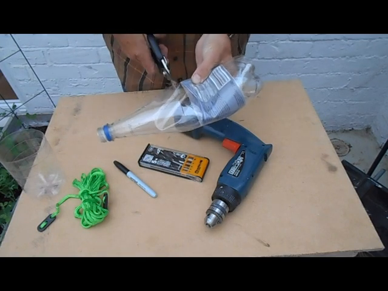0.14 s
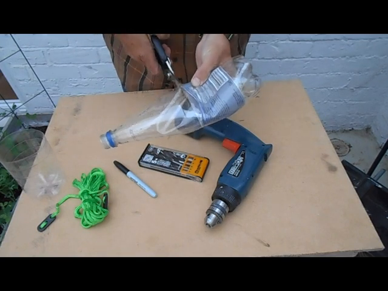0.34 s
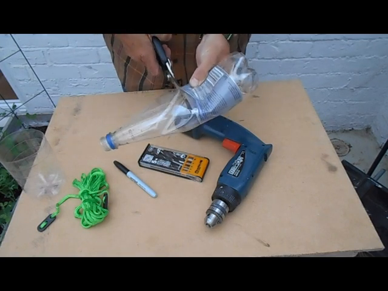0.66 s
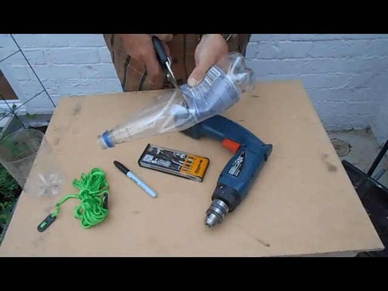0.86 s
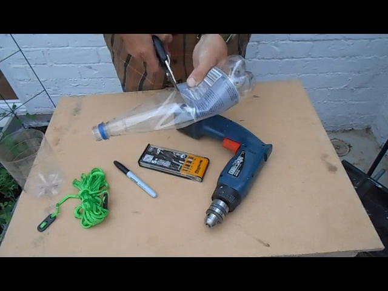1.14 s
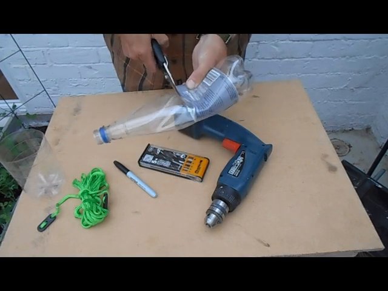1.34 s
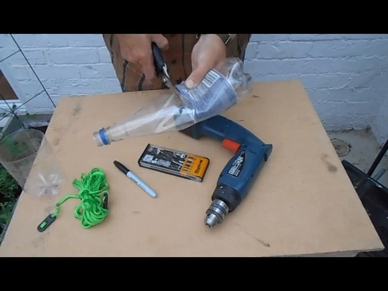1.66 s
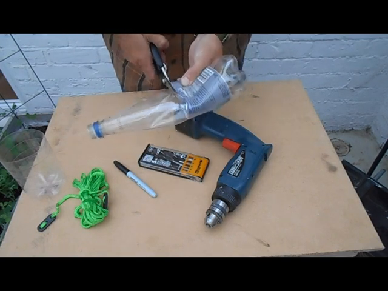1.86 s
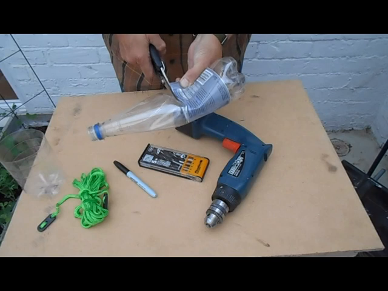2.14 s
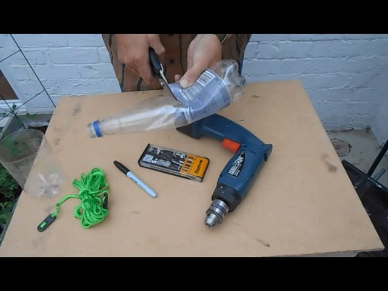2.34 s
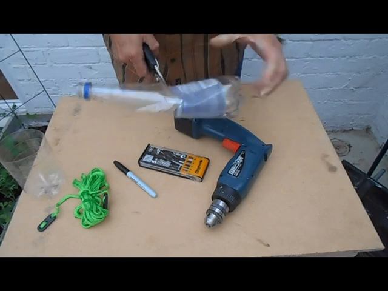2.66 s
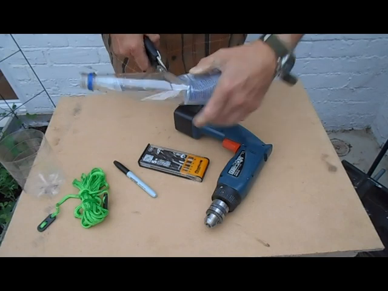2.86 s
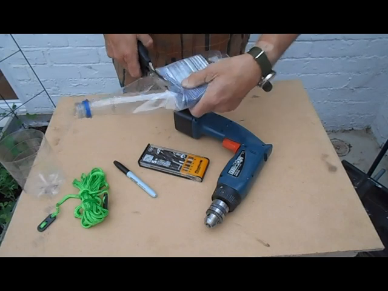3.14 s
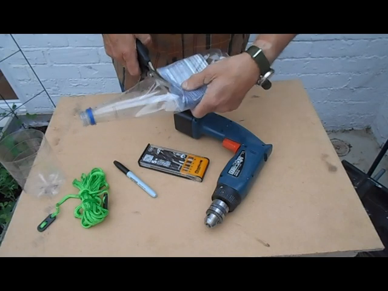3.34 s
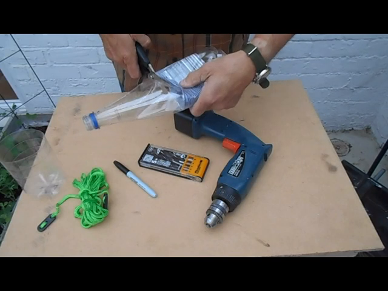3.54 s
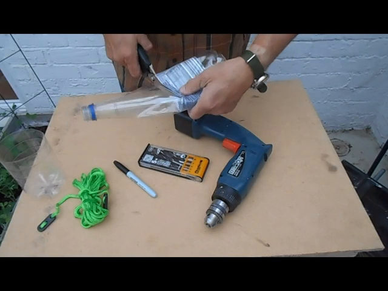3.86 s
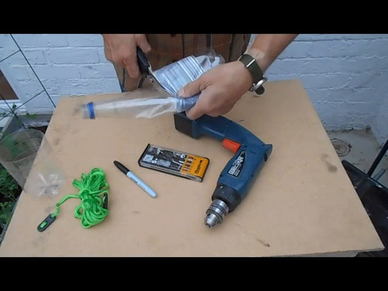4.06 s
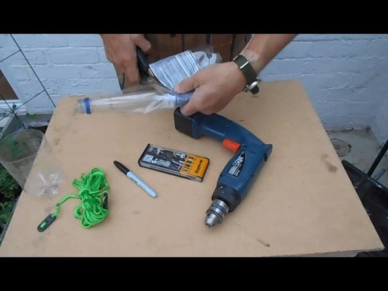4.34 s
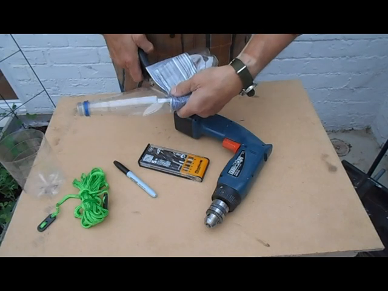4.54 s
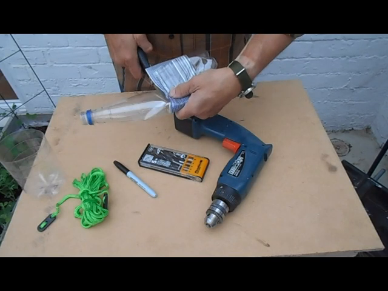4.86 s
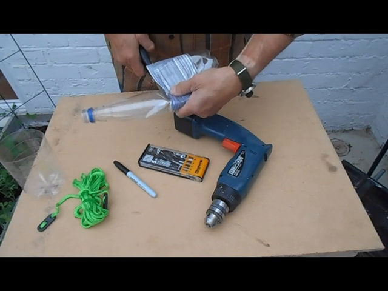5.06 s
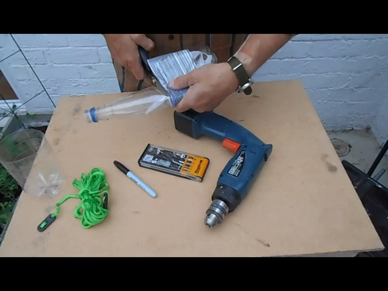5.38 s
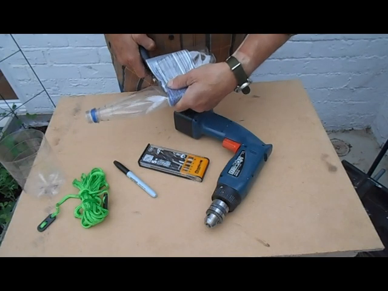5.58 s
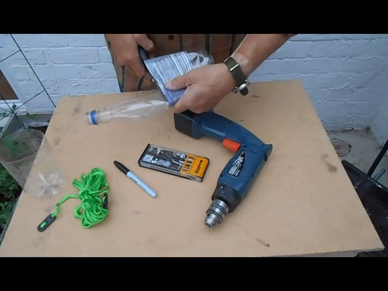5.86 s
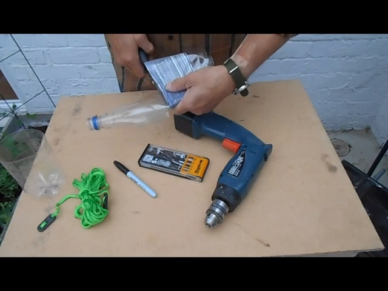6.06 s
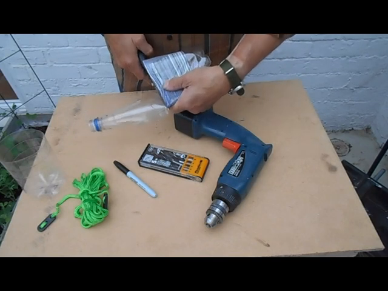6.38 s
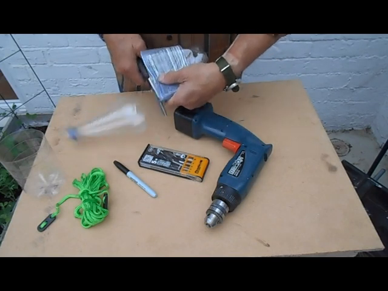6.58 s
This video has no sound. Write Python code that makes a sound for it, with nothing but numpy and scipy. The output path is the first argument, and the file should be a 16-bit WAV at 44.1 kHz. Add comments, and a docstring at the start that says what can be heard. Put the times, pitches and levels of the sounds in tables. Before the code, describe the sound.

Close view of shears cutting a thin plastic bottle over an outdoor workbench. A nearly quiet first second has faint grip rustle, then bright snaps and tiny ripping ticks come in irregular clusters. The hollow wall pops and crinkles more as the cut opens, with short squeaky tears midway. The loudest crack comes at the end as the piece gives way. Each blow rings briefly in the shell and walled yard.

```python
"""Quiet outdoor air and a faint rustle of the grip, then shears cut round a thin plastic bottle
over a workbench in a walled yard. The wall snaps, ticks and buckles under the blades, tears in runs of tiny
slips that quicken with the force of the hand, and crinkles more in the grip as the cut opens.
Noise bursts make the snaps, pulses the slips and ticks, sines the buckles, random grains the rustle;
everything rings in the hollow shell and off the bench and bricks."""
import sys
import numpy as np
from scipy import signal
from scipy.fft import rfft
from scipy.io import wavfile
from scipy.ndimage import uniform_filter1d

SR = 44100
rng = np.random.default_rng(int(sys.argv[2]) if len(sys.argv) > 2 else 0)


def store_wav(level_fs):
    """Save 16-bit WAV to argv[1]."""
    pcm = np.round(np.clip(np.atleast_2d(level_fs), -1, 1) * 32767)
    wavfile.write(sys.argv[1], SR, pcm.T.astype(np.int16))


N = 295911
TAPS = 2048  # samples in one short sound or filter
HZ = np.fft.rfftfreq(TAPS, 1 / SR)

# edges of the bands that share out a snap's level: edge_hz
SNAP_EDGES = [280, 800, 1800, 4200, 10000]


def amp(db):
    """Decibels to gain."""
    return 10 ** (np.asarray(db) / 20)


def unit(x):
    """Scales to an rms of one."""
    return x / np.sqrt(np.mean(x ** 2) + 1e-20)


def read(points, hz=HZ):
    """Joins (Hz, value) points on a log-frequency axis."""
    f, value = np.transpose(points)
    return np.interp(np.log(hz + 1), np.log(f + 1), value)


def add(mix, s, sound):
    """Mixes a sound in at time s."""
    part = mix[max(round(s * SR), 0):][:len(sound)]
    part += sound[:len(part)]


def click(db):
    """The sharpest causal pulse with this spectrum (minimum phase)."""
    log_gain = np.log(amp(np.r_[db, db[-2:0:-1]]))
    return np.fft.ifft(np.exp(np.conj(signal.hilbert(log_gain)))).real


def through(x, response):
    """Passes a sound through an impulse response."""
    return signal.oaconvolve(x, response)[:N]


def yard_air(level_db=-71):
    """Distant outdoor air: steady noise, coloured."""
    # colour of the air: pitch_hz, relative_level_db
    air_colour = [(25, -4.5), (90, 9), (400, 18.5), (3000, 12), (9000, -3.5), (15000, -80)]
    return amp(level_db) * unit(through(rng.standard_normal(N), click(read(air_colour))))


def slip(flutter=0.3, flutter_decay_s=0.0018, patch_db=7):
    """One slip: a sharp pulse, coloured by the patch of wall that flutters beside the blade."""
    # colour of one slip: pitch_hz, relative_level_db
    slip_colour = [(60, -48.5), (200, -23), (450, -4), (900, 1.5), (1800, 2.5), (3200, 7.5), (6000, 3.5),
                   (9000, 1), (14000, -7)]
    t = np.arange(TAPS) / SR
    wall = (t == 0) + flutter * rng.standard_normal(TAPS) * np.exp(-t / flutter_decay_s)
    octaves = np.log2((HZ + 1) / 4000) - rng.uniform(-1, 1)  # from the patch's own pitch
    patch = 1 / (1 + (10 * octaves) ** 2)
    pulse = through(wall, click(read(slip_colour) + patch_db * patch))[:TAPS]
    return -pulse / np.linalg.norm(pulse)


def grains(per_s, spread_db):
    """Random tiny ticks, a few of them much larger than the rest."""
    size = amp(spread_db * np.minimum(rng.exponential(1, N), 4))
    struck = rng.choice([-1, 1], N) * (rng.random(N) < per_s / SR)
    return unit(size * struck)


def handling(rub_db=-1, crinkle_db=-13.0, crinkle_db_per_s=2.5, waver_db=2):
    """Each shift of the grip swells, wavers and fades: dull rubbing and crinkling from several patches of wall."""
    # shifts of the grip on the bottle: middle_s, half_length_s, relative_level_db
    shifts = [(.01, 0.027, -58.5), (0.226, 0.084, -58.5), (0.431, 0.027, -50), (0.903, 0.022, -42.5),
              (1.14, 0.038, -43), (1.382, 0.29, -55), (1.397, 4.6, -62.5), (1.808, 0.071, -42.5),
              (2.073, 0.051, -52), (2.193, 0.097, -39.5), (2.508, 0.037, -41.5), (3.082, 0.097, -39),
              (3.48, 0.05, -41.5), (3.692, 0.2, -46.5), (3.99, 0.037, -34.5), (4.126, 0.0084, -43),
              (4.244, 0.13, -44), (4.418, 0.026, -35.5), (4.89, 0.011, -42), (5.37, 0.088, -51),
              (6.177, 0.031, -48), (6.476, 0.049, -42.5), (6.513, 0.023, -25.5)]
    # colour of rubbing: pitch_hz, relative_level_db
    rub_colour = [(50, -62), (120, -15.5), (280, -3.5), (420, 4), (900, 4), (2500, 1), (9000, -15)]
    t = np.arange(N) / SR
    grip = sum(amp(db) * np.exp(-np.minimum(((t - s) / width) ** 2, 20)) for s, width, db in shifts)
    grip = grip * amp(waver_db * unit(uniform_filter1d(rng.standard_normal(N), size=900)))
    dull = unit(through(grains(per_s=1700, spread_db=1.5), click(read(rub_colour))))
    fine = unit(sum(through(grains(per_s=250, spread_db=13.5), slip()) for _ in range(4)))
    # the wall goes slack as the cut opens, so the same shift crinkles more
    crinkle = fine * amp(crinkle_db + crinkle_db_per_s * t)
    return grip * (dull * amp(rub_db) + crinkle)


def shell(x):
    """The hollow bottle hums at its low modes after each blow."""
    # low modes of the hollow shell: pitch_hz, relative_level_db, t60_s
    shell_modes = [(150, 7, .5), (250, -3.5, .072), (381, 5, .3), (556, -2, .35), (927, -2, .3)]
    t = np.arange(SR // 2) / SR
    response = 0
    for hz, db, t60 in shell_modes:
        per_sample = 2 * np.log(1000) / (t60 * SR)  # evens out long and short modes
        response = response + amp(db - 60 * t / t60) * np.sin(2 * np.pi * hz * t) * per_sample
    return through(x, response)


def ring(x, onset_s=0.0011, turn_hz=3, clump_db=2.0):
    """Reflections arrive in uneven clumps and die away band by band; their pattern shifts as the bottle turns."""
    # the lingering ring of shell and yard: pitch_hz, relative_level_db, t60_s
    table = np.array([(149, -16.5, 0.5), (454, 1, 0.32), (1100, -1, 0.26), (2980, -5, 0.24),
                      (4850, -4, 0.28), (12000, -9, 0.24)])
    out = np.zeros(N)
    for k in range(3):
        taps = rng.standard_normal(SR // 2) * (rng.random(SR // 2) < .15)  # sparse reflections
        taps *= amp(clump_db * unit(uniform_filter1d(rng.standard_normal(SR // 2), size=100)))
        hz, t, z = signal.stft(unit(taps), SR, nperseg=256)
        db = read(table[:, [0, 1]], hz)[:, None]
        t60 = read(table[:, [0, 2]], hz)[:, None]
        z *= amp(db - 60 * t / t60) * np.sqrt(2 * np.log(1000) / (t60 * SR))
        tail = signal.istft(z, SR, nperseg=256)[1]
        tail *= 1 - np.exp(-np.arange(len(tail)) / SR / onset_s)
        # three patterns take turns at a constant total power
        share = np.cos(np.pi * (turn_hz * np.arange(N) / SR + k / 3)) * np.sqrt(2 / 3)
        out += through(x * share, tail)
    return out


def crack_bands(level_db, tilt_db, pitch_hz, hump_db, middle_hz=1930, arch_db=1.13):
    """Shares a snap's level out over the bands by its brightness and the resonance of its panel."""
    edges = np.array(SNAP_EDGES)
    centres = np.sqrt(edges[1:] * edges[:-1])
    octaves = np.log2(centres / middle_hz)
    hump = hump_db / (1 + np.log2(centres / pitch_hz) ** 2)
    shape_db = tilt_db * octaves - arch_db * octaves ** 2 + hump
    return level_db + shape_db - 20 * np.log10(np.linalg.norm(amp(shape_db)))


def snap(decay_s, pitch_hz, band_db, panel_db=5, width_hz=330, damping=0.088, hollow=1.0, carried=0.84,
         level_db=-0.5, jerk_db=2.5):
    """A crack runs in jerks, stops short and rings the panel it crosses; returns (direct, spread into shell)."""
    t = np.arange(TAPS) / SR
    jerks = amp(jerk_db * unit(uniform_filter1d(rng.standard_normal(TAPS), size=70)))
    burst = rng.standard_normal(TAPS) * jerks * np.exp(-.5 * (t / decay_s) ** 2)
    own_db = 10 * np.log10(uniform_filter1d(abs(rfft(burst)) ** 2, size=25))
    edges = np.array(SNAP_EDGES)
    # band levels over 10 ms become energy per frequency bin
    density_db = band_db + 10 * np.log10(SR / 100 * SR / 2 / np.diff(edges))
    centres = np.sqrt(edges[1:] * edges[:-1])
    # a small panel radiates little bass
    skirt_db = read([(30, -90.5), (110, -36.0), (340, -1.5), (700, 1.0), (7000, 2.0), (14000, -12.0)])
    crack_db = read(list(zip(centres, density_db))) + skirt_db - own_db + level_db
    panel = 1 / (1 + ((HZ - pitch_hz) / (width_hz + damping * pitch_hz)) ** 2)
    # the duller the snap, the clearer its pitch
    tock_db = hollow * min(band_db.max() - band_db[-1], 20)
    pitch_db = panel_db * panel + tock_db * (panel - .5)
    # the panel stops at once, so less of its pitch carries into the lingering ring
    return [through(burst, click(crack_db + share * pitch_db)) for share in (1, carried)]


def snaps():
    """Every crack of the wall, a shaped noise burst each: rows (direct, spread into the shell)."""
    # snaps of the bottle wall: start_s, level_db (over 10 ms, before the panel's ring),
    # brightness_db_per_octave, panel_pitch_hz, hump_db (round that pitch), burst_decay_s
    cracks = [(0.1616, -55.5, -1.5, 1160, 13, 0.0026), (0.1827, -42.5, 0.5, 430.0, -5.5, 0.0037),
              (0.6648, -53.5, 0.5, 4040.0, 5, 0.0026), (0.7554, -45, 2.5, 2430, 5.5, 0.02),
              (0.968, -39, -3.5, 705, 7, 0.0026), (0.968, -37.5, -4, 2040, 6, 0.0025),
              (1.104, -29, 6, 3470, 19, 0.00067), (1.143, -26.5, 11.5, 404, 33, 0.0035),
              (1.163, -23.5, 7, 5650, -11, 0.0024), (1.1762, -27, 11, 7050, -10, 0.0017),
              (1.1806, -29, 3.5, 5140, 10, 0.0011), (1.227, -27, 4.5, 4370, 27, 0.0014),
              (1.3979, -35.5, 0.5, 2100, 1.5, 0.022), (1.586, -19, 5, 2320, 8.5, 0.0025),
              (1.632, -34.5, 0.5, 1280, 2, 0.0016), (1.6623, -35.5, 4, 1170, 11, 0.0012),
              (1.68, -25, 4, 2820, 0, 0.0022), (2.044, -38, -2, 1080, 0.5, 0.0026),
              (2.076, -35.5, 4.2, 1880, 18, 0.00055), (2.1074, -29, -3, 1100, 1, 0.004),
              (2.122, -25.5, 2, 9150, 16, 0.0055), (2.1678, -27, -0.5, 9300, 27, 0.0057),
              (2.27, -30, 0, 860, 6, 0.0015), (2.323, -33.5, 4.5, 4630, 1, 0.0018),
              (2.426, -34, -2.5, 8350, 3, 0.0015), (2.5908, -21, -0.5, 3130, 2, 0.0032),
              (2.7174, -24.5, -3, 4400, 13.5, 0.0023), (2.993, -29, 2.5, 2140, -7, 0.0041),
              (3.0671, -22.5, 1.5, 1100, -4, 0.0027), (3.117, -31, 4, 1190.0, 9, 0.0036),
              (3.259, -36, -5.5, 404, -9.5, 0.0041), (3.31, -41.5, 2.5, 4800, 10, 0.00089),
              (3.411, -31, -1, 630, 4, 0.0022), (3.4853, -36, 0, 1410, -12, 0.0012),
              (3.5014, -36, 0, 1910, -5, 0.0028), (3.608, -29.5, 1, 364, 4, 0.003),
              (3.664, -20.5, 0, 3400, 8, 0.002), (3.813, -17.5, 2, 2144, 1.5, 0.0044),
              (3.993, -26.5, -4, 4100, -9, 0.0046), (4.139, -19.5, 2.5, 8400, 4, 0.0062),
              (4.3263, -32, -4.5, 1960, 6.5, 0.00096), (4.423, -27.5, 2, 1370, 6, 0.0012),
              (4.4492, -30, -0.5, 6350, 16, 0.0015), (4.6495, -25, -1.5, 7400, 12, 0.0051),
              (4.9843, -23, 1.5, 5350, 8.5, 0.003), (5.162, -29, 2.5, 870, 1.5, 0.0027),
              (5.3351, -33.5, 0.8, 2060, -4.5, 0.003), (5.401, -44, -1, 910, -8, 0.0027),
              (5.417, -53, 14, 6870, 5, 0.00081), (5.434, -48.5, 1, 7750, 17, 0.0006),
              (5.671, -27.5, 3.5, 3800, 20, 0.013), (5.85, -25.5, 0.9, 5200, 15, 0.0024),
              (5.866, -30.5, 4, 2330, 0, 0.0031), (5.8854, -29.5, 8.5, 2470, 14, 0.0012),
              (5.8931, -31, 5, 2000, 3, 0.0025), (6.018, -18.5, 2, 2600, 3, 0.0026),
              (6.5017, -23.5, 4, 860, 18.5, 0.0055), (6.5061, -13, 3, 780, -16, 0.02),
              (6.5933, -21.5, 0.2, 960, 5.5, 0.001), (6.641, -30, -2, 4220, 29, 0.0018)]
    out = np.zeros((2, N))
    for s, level_db, tilt_db, pitch_hz, hump_db, decay_s in cracks:
        band_db = crack_bands(level_db, tilt_db, pitch_hz, hump_db)
        for path, sound in zip(out, snap(max(decay_s, .0003), pitch_hz, band_db)):
            add(path, s, sound)
    return out


def ticks(decay_s=0.00065):
    """A crease gives in one go: a slip drawn out into a very short crack."""
    # single sharp ticks: start_s, level_db (over 10 ms)
    creases = [(0.218, -51), (.872, -44.5), (.883, -56), (0.907, -42.5), (1.19, -27.5), (1.231, -30.5),
               (1.24, -31), (2.516, -40), (2.573, -50), (2.977, -57), (2.985, -42), (3.461, -44),
               (4.776, -37), (4.786, -32), (5.152, -42), (5.344, -34.5), (5.643, -39.5), (5.6767, -37),
               (5.69, -34.5), (5.7035, -30), (5.732, -37.5), (5.744, -33), (5.762, -28.5), (5.779, -30),
               (5.805, -43), (6.116, -36), (6.478, -39), (6.486, -30.5)]
    out, t = np.zeros(N), np.arange(TAPS) / SR
    for s, db in creases:
        crack = through(rng.standard_normal(TAPS) * np.exp(-t / decay_s), slip())
        add(out, s, amp(db) * np.sqrt(SR / 100) * crack / np.linalg.norm(crack))
    return out


def buckles(beat_cycles=4.9, side_share=0.65, low_hz=330):
    """A panel flips and rings with neighbours beating against it; the longer it rings, the closer they lie."""
    # whole panels popping over and ringing on: start_s, pitch_hz, level_db (before the decay), t60_s
    panels = [(.425, 519, -44.5, 0.1), (.915, 680, -35, 0.038), (.973, 652, -23, 0.04),
              (2.718, 677, -28, 0.053), (2.992, 1950, -21.5, 0.019), (3.41, 1080, -22, 0.038),
              (4.141, 4010, -18.5, 0.047), (6.019, 571, -21, 0.097), (6.017, 816, -18, 0.031),
              (6.508, 912, -12.5, 0.048), (6.594, 852, -24.5, 0.037), (6.593, 4480, -21, 0.031)]
    out, t = np.zeros(N), np.arange(SR // 3) / SR
    for s, hz, db, t60 in panels:
        sides = 0
        for off, turn in rng.uniform(-0.84, 1, size=(8, 2)):
            side_hz = hz + off * beat_cycles / t60
            sides = sides + np.sin(2 * np.pi * (side_hz * t + turn))
        modes = np.sin(2 * np.pi * hz * t) + side_share * sides
        attack = np.minimum(t / .001, 1)
        add(out, s, amp(db - 60 * t / t60) * unit(modes) * attack)
    # the buckles carry nothing below the low mids, so their onsets give no thud
    return signal.sosfilt(signal.butter(2, low_hz, "high", fs=SR, output="sos"), out)


def tears(jitter=0.6, steady_hz=330, uneven_db=5, level_db=-1, db_per_doubling=25):
    """The blade sticks and slips, faster as the force grows; fast runs lock into a nearly regular squeak."""
    # runs of slips as the blades tear or scrape: start_s, length_s, relative_level_db (midway),
    # swell_db (over the run), slips_per_s (midway)
    runs = [(1.061, 0.049, -50, -3.5, 97), (1.135, 0.041, -47, -3.5, 240), (1.266, 0.14, -46.5, -8.5, 74),
            (1.409, 0.034, -46.5, 7, 78), (1.776, 0.047, -41, 5.5, 147), (2.2, 0.019, -35, 3, 630),
            (2.431, 0.019, -35.5, 3, 910), (2.515, 0.058, -45, -9, 110), (2.977, 0.13, -42, 0.5, 100),
            (3.107, 0.047, -35, -3.5, 235), (3.456, 0.051, -65, 11, 120), (4.146, 0.021, -31, -3, 890),
            (4.415, 0.026, -33.5, 6.5, 900), (4.46, 0.013, -34.5, 20.5, 1330),
            (4.472, 0.033, -25.5, -4, 1480), (4.535, 0.011, -33, 18.5, 720),
            (4.659, 0.021, -27.5, -7.5, 660), (4.666, 0.024, -31, -4, 243), (4.79, 0.069, -29.5, -3.5, 360),
            (5.597, 0.062, -44.5, 16.5, 314), (5.672, 0.12, -39, -1, 193), (5.804, 0.11, -37.5, 2, 170),
            (5.883, 0.14, -35.5, -3.5, 186), (6.112, 0.013, -34.5, 7.5, 430),
            (6.404, 0.0072, -42, -9.5, 1640)]
    out, kinds = np.zeros(N), [slip() for _ in range(12)]
    for s, length, run_db, swell_db, mid_rate in runs:
        loose = 1 / (1 + (mid_rate / steady_hz) ** 4)  # near 0 in a locked, regular run
        u = 0  # share of the run that is cut
        for late, size, kind in rng.uniform(-1, 1, (120, 3)):
            if u >= 1:
                break
            force_db = swell_db * (u - .5)
            # a harder squeeze is louder and faster
            rate = mid_rate * 2 ** (force_db / db_per_doubling)
            slip_db = level_db + run_db + force_db + uneven_db * loose * size
            gain = amp(slip_db) * np.sqrt(SR / rate)
            add(out, s + u * length, gain * kinds[int(abs(kind) * len(kinds))])
            u += np.exp(late * jitter * loose) / rate / length
    return out


def scene():
    """The cutting, its ring and the quiet yard."""
    direct, spread = snaps() + buckles() + tears() + ticks() + handling()  # only snaps differ by path
    hum = shell(spread)
    air = yard_air()
    return (direct + hum + ring(spread + hum) + air)[None]


def record(dry, ceiling=0.86, lopsided=0.003, edge_hz=14600):
    """Loud peaks round off unevenly, adding a faint thud; then the microphone's colour and the band limit."""
    # microphone colour: pitch_hz, gain_db
    mic_colour = [(20, -9), (70, 1.5), (8000, 0.5), (9500, -2.5), (10400, -15), (11200, -36),
                  (12200, -11.5), (13300, -19.5), (14500, -29.5)]
    bent = ceiling * np.tanh(dry[0] / ceiling)
    heard = through(bent + lopsided * bent ** 2, click(read(mic_colour)))
    band_limit = signal.firwin(255, edge_hz, window=("kaiser", 8), fs=SR)
    return signal.oaconvolve(heard, band_limit, "same")[None]


dry = scene()
out = record(dry)
store_wav(out)
```